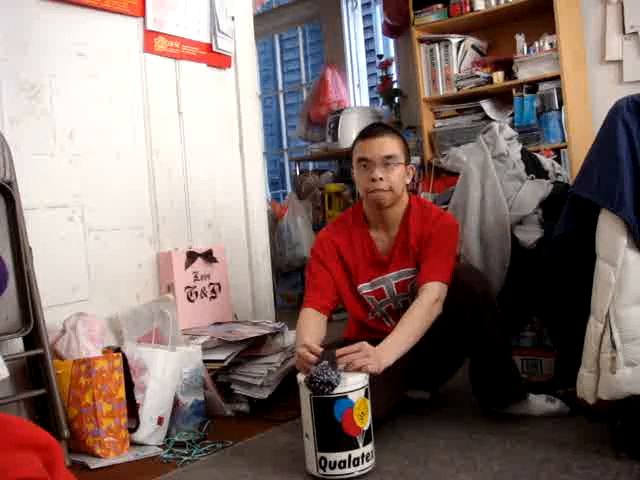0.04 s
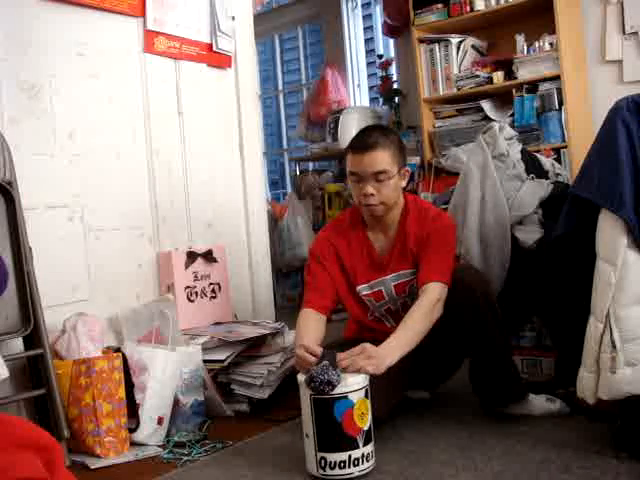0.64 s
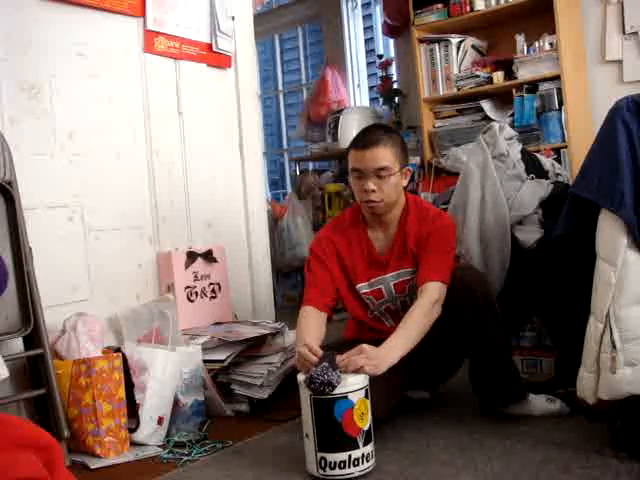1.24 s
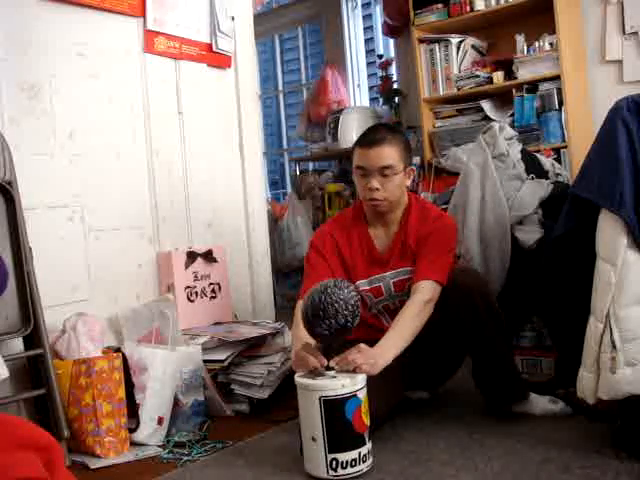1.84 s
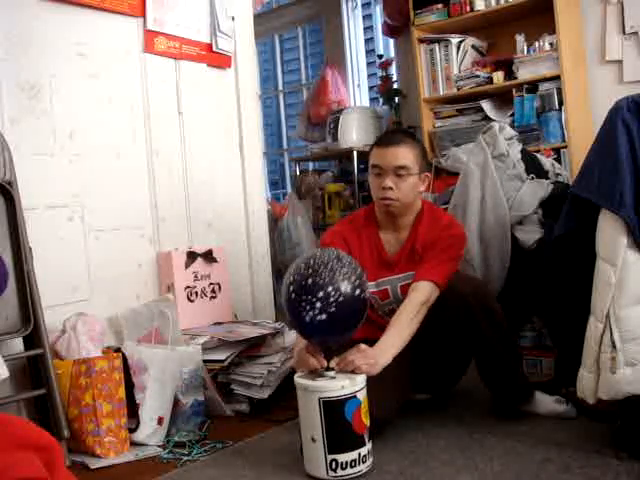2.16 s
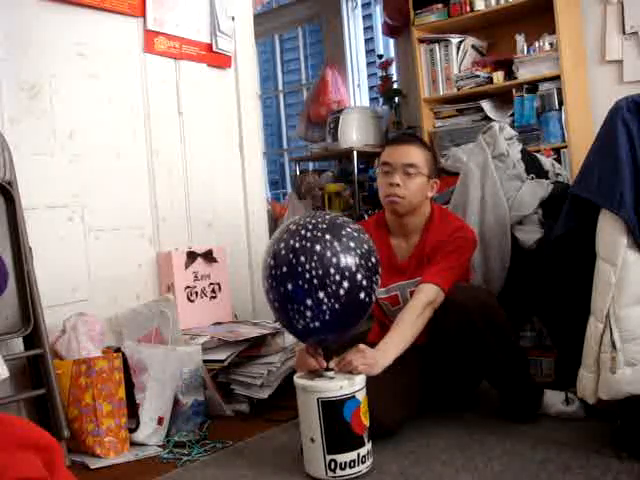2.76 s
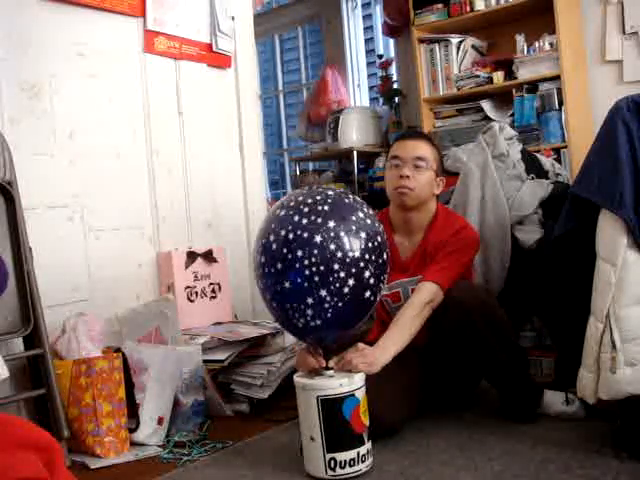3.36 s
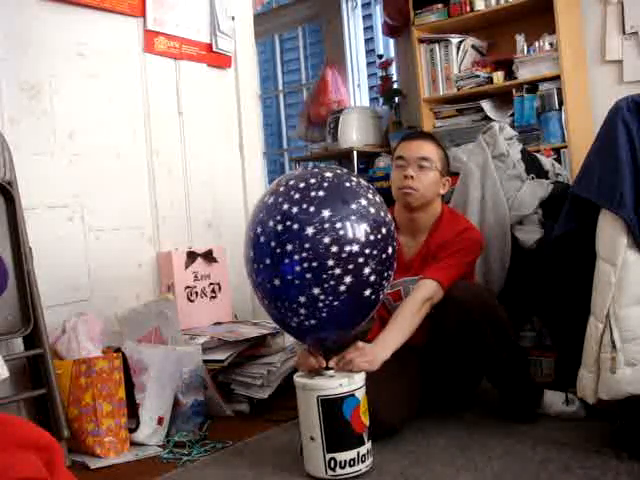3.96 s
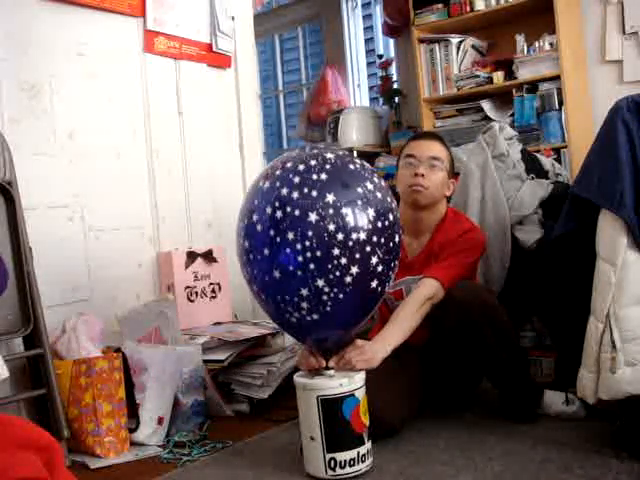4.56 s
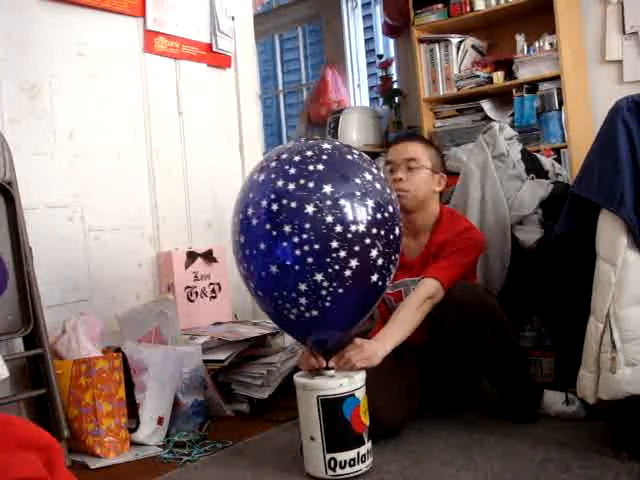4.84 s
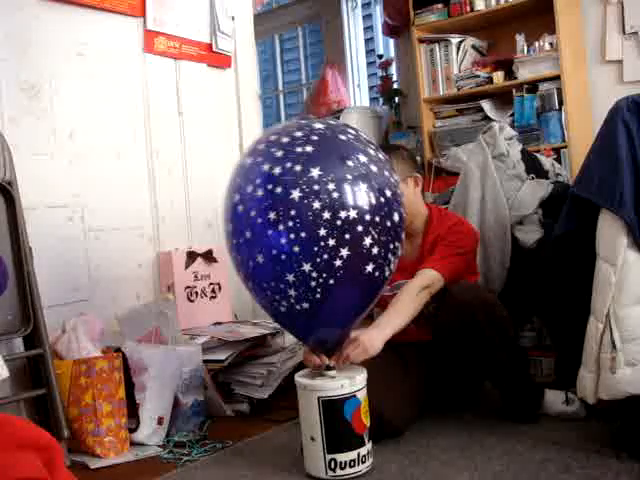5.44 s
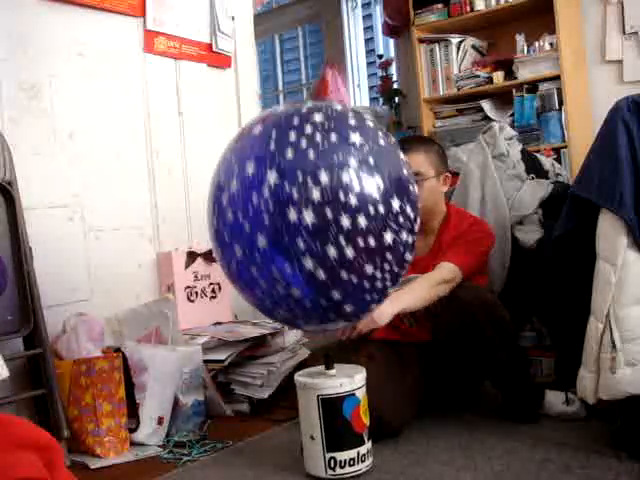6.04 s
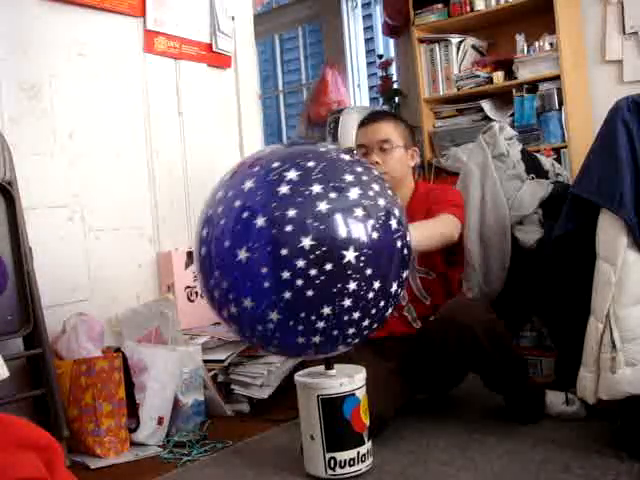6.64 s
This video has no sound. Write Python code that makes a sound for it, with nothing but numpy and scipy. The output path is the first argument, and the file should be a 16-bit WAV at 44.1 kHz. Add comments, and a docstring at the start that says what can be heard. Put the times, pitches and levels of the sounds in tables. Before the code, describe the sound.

A balloon is handled softly before an electric pump kicks in, its motor growling and climbing quickly to a steady whine. Air rushes into the balloon, with a few low puffs reaching the microphone. After about four seconds the motor cuts out and coasts down in pitch, and air escapes around the balloon's neck in short hisses and whistles. The small furnished room adds only a short echo.

```python
"""An electric balloon pump blows up a latex balloon on the floor of a small, cluttered room.
After a faint tick and soft rubbing sounds, the mains motor growls and chirps up to speed.
Its six-bladed fan whines over a rush of air in the pump's can and nozzle. Switched off,
it coasts down while the balloon is pulled away and air whistles past the rubber neck."""
import sys
import numpy as np
from scipy import signal
from scipy.fft import rfft, irfft
from scipy.io import wavfile
from scipy.ndimage import uniform_filter1d

SR = 44100
rng = np.random.default_rng(int(sys.argv[2]) if len(sys.argv) > 2 else 0)


def pcm_store(signal):
    """Save signal as 16-bit PCM."""
    levels = np.round(np.clip(np.atleast_2d(signal), -1, 1) * 32767)
    wavfile.write(sys.argv[1], SR, levels.astype(np.int16).T)


N = 295911
T = np.arange(N) / SR

ON_S, OFF_S = 1.584, 5.5
RELEASE_S, SLIP_S, LIFT_S = 5.81, 0.013, 0.2  # the neck slips off, then the balloon is lifted clear
MAINS_HZ, BLADES, SLOTS = 60, 6, 22


def undb(db):
    """Turn decibels into a gain to multiply by."""
    return 10 ** (np.asarray(db) / 20)


def unit(x):
    """Scale a signal to an average power of one."""
    return x / np.sqrt(np.mean(x ** 2))


def step(at_s, soft_s):
    """A smooth step from 0 to 1."""
    return .5 + .5 * np.tanh((T - at_s) / (2 * soft_s))


def noise(points):
    """Noise whose balance of low and high follows (pitch [Hz], relative level [dB]) points."""
    hz, db = np.transpose(points)
    bins = np.maximum(np.fft.rfftfreq(N, 1 / SR), 1)
    gains = undb(np.interp(np.log(bins), np.log(hz), db))
    return unit(irfft(rfft(rng.standard_normal(N)) * gains, N))


def wander(hz):
    """A smooth random wobble that changes about hz times a second."""
    return unit(signal.sosfilt(signal.butter(2, hz, fs=SR, output="sos"), rng.standard_normal(N)))


def resonate(x, hz, width):
    """One resonance: lets through the part of x near hz."""
    return signal.lfilter(*signal.iirpeak(hz, hz / width, fs=SR), x)


def ring(x, modes):
    """A body, shaken by x, rings at its own pitches."""
    return sum(undb(db) * resonate(x, hz, width) for hz, width, db in modes)


def bursts(rows, flutter_db, flutter_hz):
    """Short swells of fluttering noise, each around its own pitch."""
    out = np.zeros(N)
    for peak_s, length, hz, width, db in rows:
        band = resonate(rng.standard_normal(N), hz, 1.5 * width)
        band = unit(resonate(band, hz, 1.5 * width))  # a second pass narrows it to about `width`
        out += undb(db) * band * np.exp(-2 * ((T - peak_s) / length) ** 2)
    return out * undb(flutter_db * wander(flutter_hz))


def room(x, wet_db, fade_s=0.22):
    """Add the short, dense echo of a furnished room; the power stays the same."""
    t = T[:SR // 3]
    echo = rng.standard_normal(len(t)) * np.exp(-np.log(1000) * t / fade_s) * (t > .003)
    response = undb(wet_db) * echo / np.linalg.norm(echo)
    response[0] = 1
    return signal.fftconvolve(x, response / np.linalg.norm(response))[:N]


# The room's own noise (pitch [Hz], relative level [dB])
ROOM_NOISE = [(15, -63), (25, -14), (75, -1), (137, -7), (164, -2), (506, -0.5), (667, -5.5), (1190, -5.5),
              (3960, -13.5), (7220, -14.5), (10000, -17.5), (13000, -47.5), (22000, -120)]

def background():
    """The quiet room: a faint, almost steady noise."""
    return noise(ROOM_NOISE) * undb(-55 + .3 * wander(2.7))


# Low puffs of air (time [s], length [s], pitch [Hz], width [Hz], level [dB])
PUFFS = [(1.742, .03, 230, 300, -35), (2.315, 0.028, 55, 90, -41), (2.42, 0.18, 28, 40, -44),
         (5.8, 0.039, 30, 50, -51)]

def draught():
    """The balloon flips upright, and stray air buffets the microphone."""
    return bursts(PUFFS, flutter_db=8.0, flutter_hz=30)


# A tick, then soft rubs (time [s], length [s], pitch [Hz], width [Hz], level [dB])
TICK_AND_RUBS = [(.083, 0.0049, 4200, 3000, -48), (.62, .07, 4000, 4000, -62.5), (1.06, .1, 7470, 200, -67),
                 (1.16, .05, 4650, 500, -62), (1.17, .1, 6700, 2500, -64)]

def tick_and_rubs():
    """A faint tick at the start, then soft rubbing sounds."""
    return bursts(TICK_AND_RUBS, flutter_db=5.0, flutter_hz=80)


# Gushes and whistles (time [s], length [s], pitch [Hz], width [Hz], level [dB])
LEAKS = [(1.735, 0.064, 3970, 5000, -30), (1.742, .03, 550, 600, -27.5), (1.755, 0.043, 1130, 70, -22.5),
         (3.03, 0.27, 5000, 7000, -27), (5.71, 0.16, 4370, 5000, -23), (5.795, .045, 1870, 600, -19.5),
         (5.805, 0.055, 3930, 2500, -18), (6.07, 0.17, 2740, 480, -22), (6.115, .066, 1680, 500, -23),
         (6.17, 0.048, 2720, 350, -19), (6.31, 0.061, 5000, 5000, -26.5), (6.6, 0.49, 443, 375, -34)]

def leaks():
    """Air gushes into the limp neck, later escapes past it, then leaves the open nozzle."""
    return bursts(LEAKS, flutter_db=0.5, flutter_hz=120)


# A quick kick, a slower climb and a last creep (speed gained [turns/s], time to gain 63% of it [s])
SPIN_UP = [(122.8, .1403), (186, .3608), (4.6, 3.35)]

def shaft_speed(half_speed_s=1.625):
    """Turns per second: the motor speeds up and levels off; once off, air drag alone slows it."""
    driven_s = np.clip(T, ON_S, OFF_S) - ON_S
    run_up = sum(hz * (1 - np.exp(-driven_s / lag_s)) for hz, lag_s in SPIN_UP)
    return run_up / (1 + np.maximum(T - OFF_S, 0) / half_speed_s)


def early():
    """1 early in the run, easing off to 0 near 2.5 s."""
    return 1 - step(at_s=2.55, soft_s=0.058)


def loudness(law, speed):
    """How loud a fan sound is, from the speed and the balloon, with extra loudness early in the run."""
    db, power, early_db, full_db, open_db, neck_db = law
    released = step(RELEASE_S, SLIP_S)
    fill = np.clip((T - ON_S) / (RELEASE_S - ON_S), 0, 1) * (1 - released)
    neck_near = released * np.exp(-np.maximum(T - RELEASE_S, 0) / LIFT_S)
    added_db = early_db * early() + full_db * fill + open_db * released + neck_db * neck_near
    return undb(db + added_db) * (speed / speed.max()) ** power


# Resonances of the air in the can (pitch [Hz], width [Hz], boost [dB])
CAN_RESONANCES = [(422, 30, -2), (508, 42, 3.5), (700, 106, -6), (784, 10, -19), (1104, 11, 3.5)]

def can(x):
    """The air inside the pump's can rings along with x."""
    return ring(x, CAN_RESONANCES)


# Low rush, bright jet and thin hiss (pitch [Hz], relative level [dB])
RUSH = [(25, -13), (90, -33), (170, -7), (380, -7), (700, 1.5), (950, 2), (1350, 6.5), (1800, 3),
        (2300, 2.5), (3200, -3), (5000, -33), (10000, -39)]
JET = [(500, -37), (1500, -4.5), (2600, -0.5), (4200, 1.5), (5000, -1.5), (6200, -1.5), (8000, -5.5),
       (10500, -29)]
HISS = [(3000, -22), (6000, -13), (7500, 10.5), (8600, 15), (9700, 18), (11000, -21.5)]
# How loud each is (level at full speed [dB], power of speed, extra loudness early in the run [dB],
# change with a full balloon [dB], with the nozzle open [dB], with the neck just above it [dB])
RUSH_LOUDNESS = (-24.5, 0.96, 4.5, -0.5, -0.5, -10)
JET_LOUDNESS = (-22, 4, 5, -1.4, 10.5, 1)
HISS_LOUDNESS = (-26.5, 5.5, 6.5, -0.5, 12, 0.5)

def air(speed):
    """Churning air roars in the can, and the nozzle's jet hisses into the balloon."""
    eddies = noise(RUSH)
    rush = unit(eddies + can(eddies)) * loudness(RUSH_LOUDNESS, speed)
    jet = noise(JET) * loudness(JET_LOUDNESS, speed) * undb(.5 * wander(26))
    hiss = noise(HISS) * loudness(HISS_LOUDNESS, speed) * undb(.5 * wander(18))
    # the roar fills the room; the narrow jet beams its treble straight out
    return room(rush, wet_db=-5) + room(jet + hiss, wet_db=-10.5)


# Swirls that circle more slowly than the blades
# (cycles per turn, wobble [Hz], duct pitch [Hz], duct width [Hz], level [dB])
SWIRLS = [(3.78, 16.85, 1230, 217, -29.5), (7.7, 28, 2370, 120, -36)]

def swirls(speed, angle):
    """The balloon pushes back and the flow breaks into swirls: hoarse tones, loud at a duct's pitch."""
    out = 0
    for per_turn, wobble_hz, duct_hz, width, db in SWIRLS:
        drift = 2 * np.pi * np.cumsum(wobble_hz * wander(39.7)) / SR
        swirl = undb(db + 3.3 * wander(30)) * np.sqrt(2) * np.sin(per_turn * angle + drift)
        out = out + resonate(swirl, duct_hz, width) + undb(-7) * can(swirl)
    return out * (speed / speed.max()) ** 3


# Resonances of the motor's frame (pitch [Hz], width [Hz], boost [dB])
FRAME_RESONANCES = [(919, 6.1, 9), (1040, 23, 5.5), (1094, 40, -7), (2190, 147, -4), (2420, 130, -21),
                    (2950, 180, -24.5)]

def motor(angle, inrush_s=0.016):
    """The magnets' pull throbs; slots in the rotor chop it into a rising chirp that rings the frame."""
    switched = (1 - np.exp(-np.maximum(T - ON_S, 0) / inrush_s)) * (T < OFF_S)
    current = undb(-12.5 + 13 * early()) * switched  # high until nearly up to speed
    mains = 2 * np.pi * MAINS_HZ * (T - ON_S)
    pull = current * np.sin(mains) ** 2  # two throbs per mains cycle
    growl = 1 + 0.29 * np.cos(angle)  # the rotor runs slightly off centre
    slots = pull * growl * np.sin(SLOTS * angle + 0.5 * wander(300))
    chirp = undb(-1.5) * ring(slots, FRAME_RESONANCES)
    brushes = pull * rng.standard_normal(N)
    scrape = undb(-11.5) * (ring(brushes, FRAME_RESONANCES) + can(brushes))
    # the brushes chatter unevenly over the slots: a hoarse, climbing whistle
    chatter = pull * np.sin(SLOTS * angle + 2.2 * wander(240))
    whistle = undb(-33.5) * resonate(chatter, hz=7700, width=5500)
    hum = current * (undb(-44) * np.cos(2 * mains) + undb(-48) * np.sin(4 * mains))
    return room(chirp + whistle + scrape, wet_db=-6.0) + hum


# Weak tones of the shaft (cycles per turn, level at full speed [dB])
SHAFT_TONES = [(1, -53.5), (8, -40.5), (9, -55)]

def shaft(speed, angle):
    """The spinning shaft adds faint tones that grow with its speed."""
    tones = sum(undb(db + 2 * wander(8.2)) * np.sin(per_turn * angle) for per_turn, db in SHAFT_TONES)
    return np.sqrt(2) * tones * (speed / speed.max()) ** 3


# Standing waves that swell or swallow the whine as it glides by (pitch [Hz], width [Hz], boost [dB])
STANDING_WAVES = [(1103, 33, 13.5), (1259, 57, 3.5), (1455, 38, 5), (1610, 22, 4.5), (1708, 29, 5),
                  (1764, 9, -7), (1796, 50, 3), (1826, 6.4, -12.5), (1842, 9.7, -8)]
# The tone an octave up, stronger as the balloon gets tight (time [s], level [dB])
OCTAVE_LEVELS = [(1.9, -58), (2.8, -33), (4.3, -40.5), (4.8, -33), (5.5, -32), (5.65, -51), (6.2, -49),
                 (6.45, -40), (6.7, -37)]
# How loud the whine is; same columns as RUSH_LOUDNESS
WHINE_LOUDNESS = (-20, 3, 2, -1, .5, -14)

def whine(speed, angle):
    """Fan blades sweep past the outlet and make a tone, which beats with its echo as it glides."""
    blades = BLADES * angle + 0.084 * wander(60)
    tone = room(np.sin(blades), wet_db=-8)
    tone /= np.sqrt(uniform_filter1d(tone ** 2, SR // 10) + 1e-6)  # even out the slow swells
    pitch = BLADES * speed
    standing_db = sum(db * np.exp(-2 * ((pitch - hz) / width) ** 2) for hz, width, db in STANDING_WAVES)
    # once lifted, the swaying balloon reflects the tone and makes it flutter
    flutter_db = 0.22 * wander(44) + 3.1 * step(RELEASE_S, SLIP_S) * wander(13)
    tone *= loudness(WHINE_LOUDNESS, speed) * undb(standing_db + flutter_db)
    octave_db = np.interp(T, *np.transpose(OCTAVE_LEVELS)) + wander(12)
    octave = np.sqrt(2) * undb(octave_db) * np.sin(2 * blades)
    flowing = step(1.807, 0.031) * (T > ON_S)  # the tones need a steady flow first
    return flowing * (tone + octave)


def scene():
    """Room, balloon and pump, the same in both channels."""
    speed = shaft_speed()
    angle = 2 * np.pi * np.cumsum(speed) / SR
    pump = motor(angle) + whine(speed, angle) + shaft(speed, angle) + swirls(speed, angle) + air(speed)
    small_sounds = leaks() + tick_and_rubs()
    mono = draught() + background() + room(small_sounds, wet_db=-5) + pump
    return np.array([mono, mono])


def record(dry, top_hz=10100):
    """Cut away the highest treble."""
    return signal.sosfilt(signal.ellip(12, .1, 80, top_hz, fs=SR, output="sos"), dry)


dry = scene()
out = record(dry)
pcm_store(out)
```